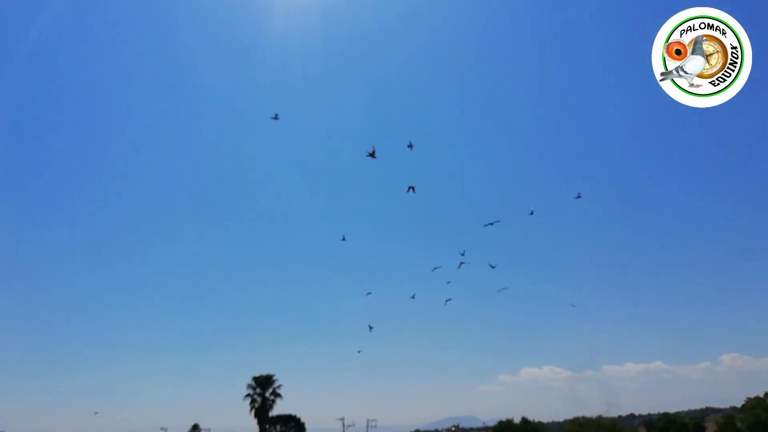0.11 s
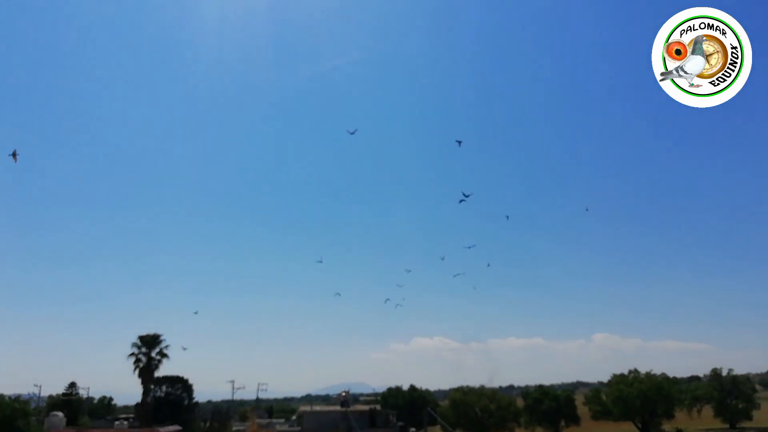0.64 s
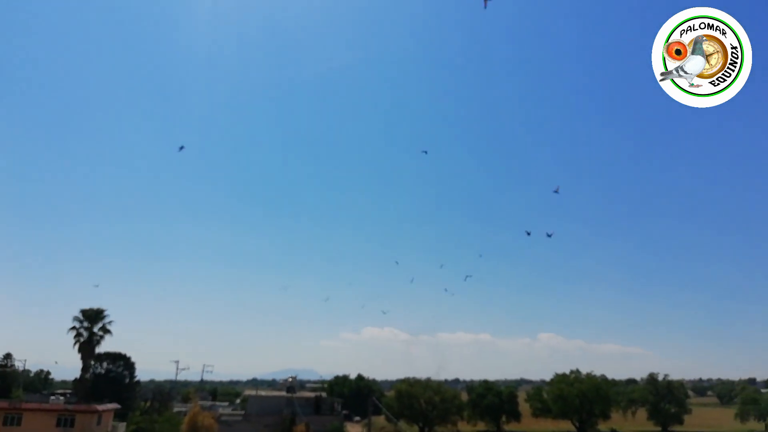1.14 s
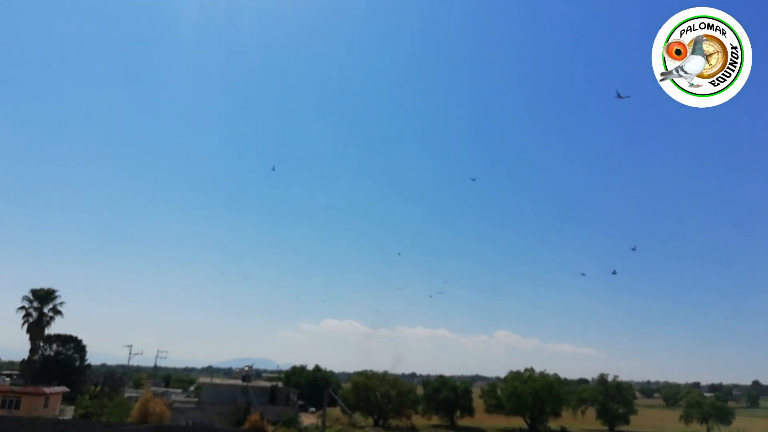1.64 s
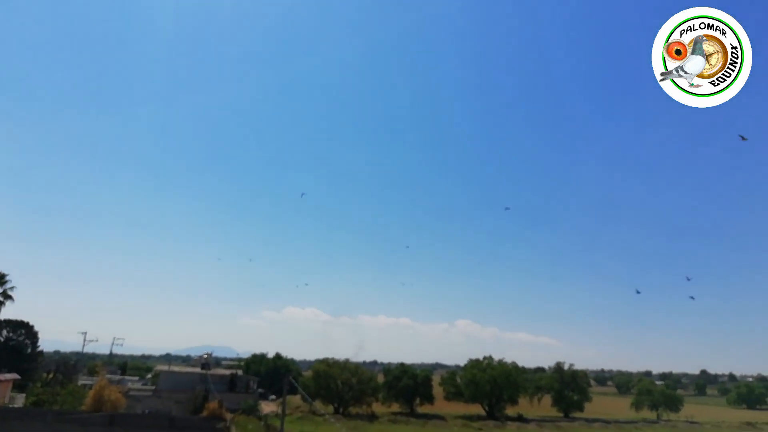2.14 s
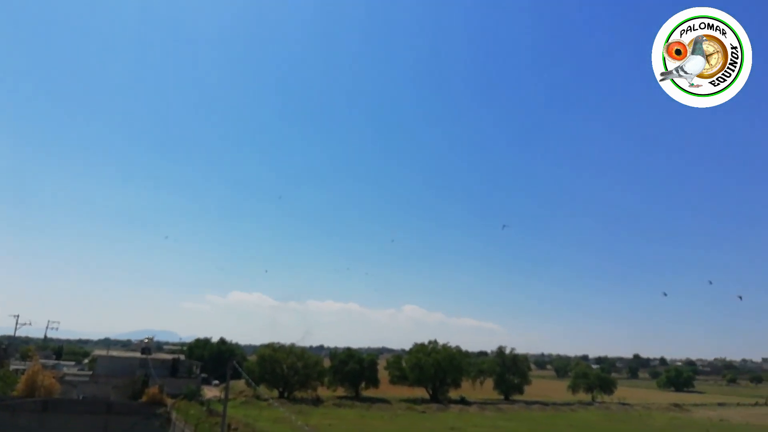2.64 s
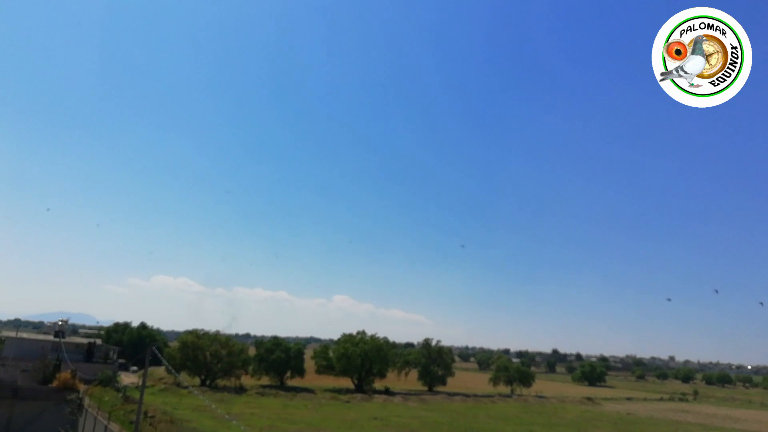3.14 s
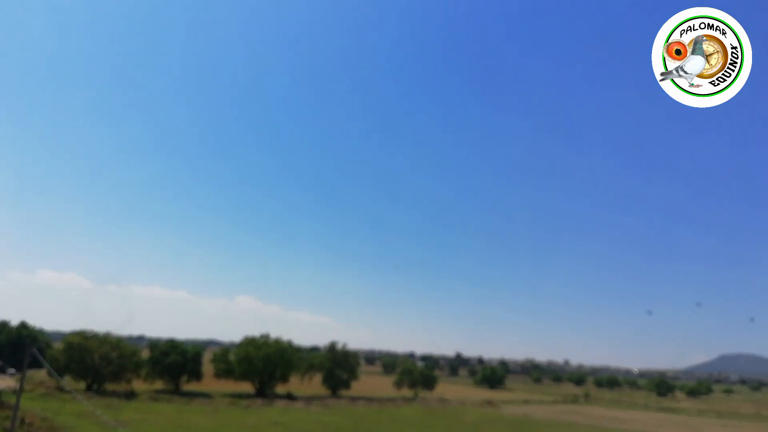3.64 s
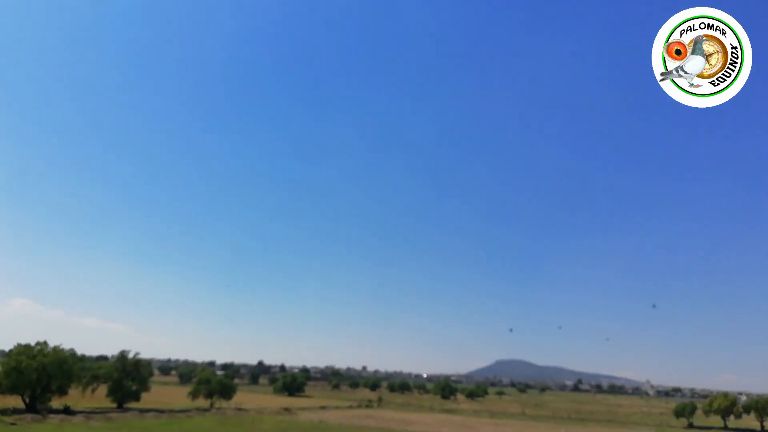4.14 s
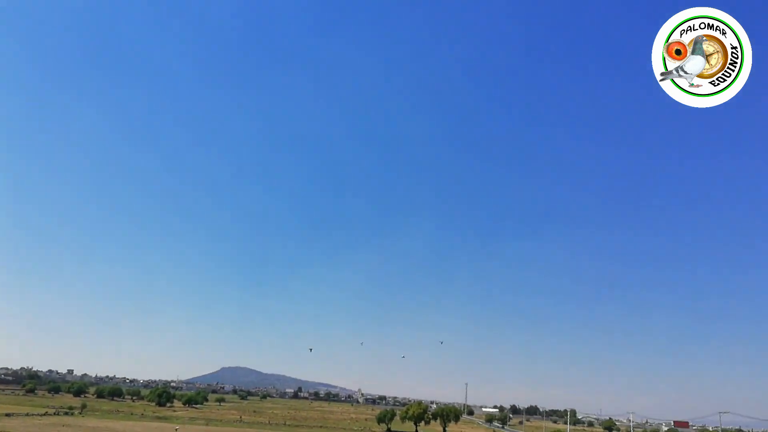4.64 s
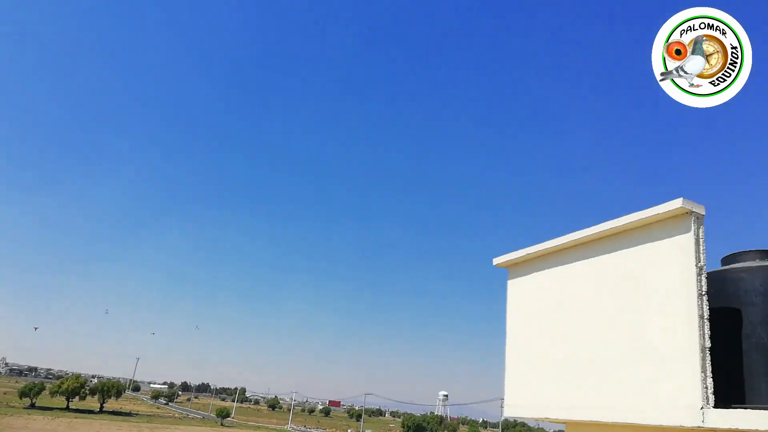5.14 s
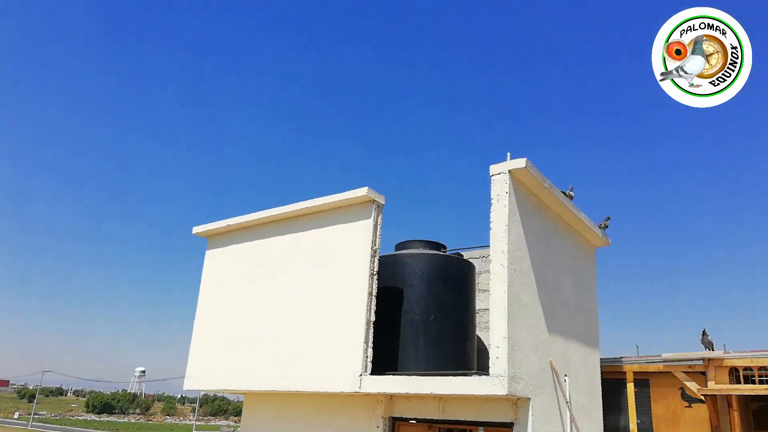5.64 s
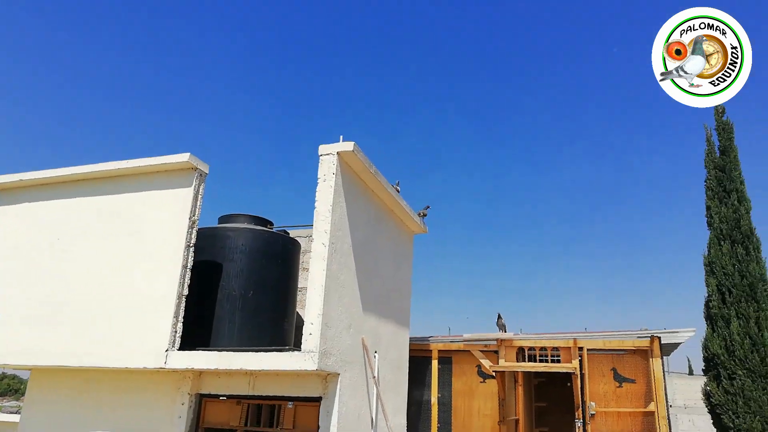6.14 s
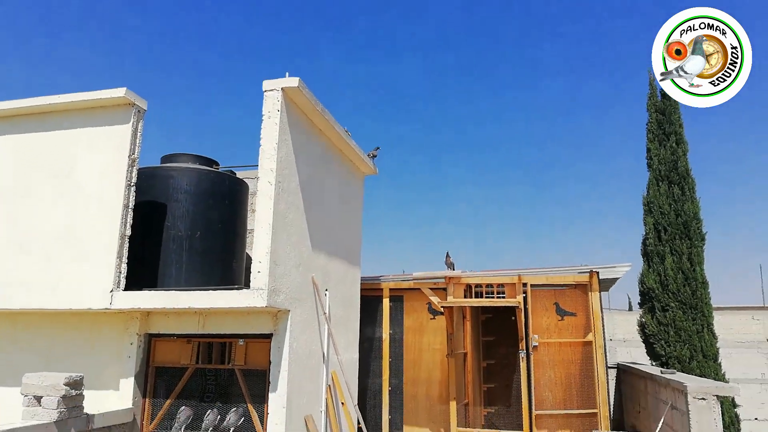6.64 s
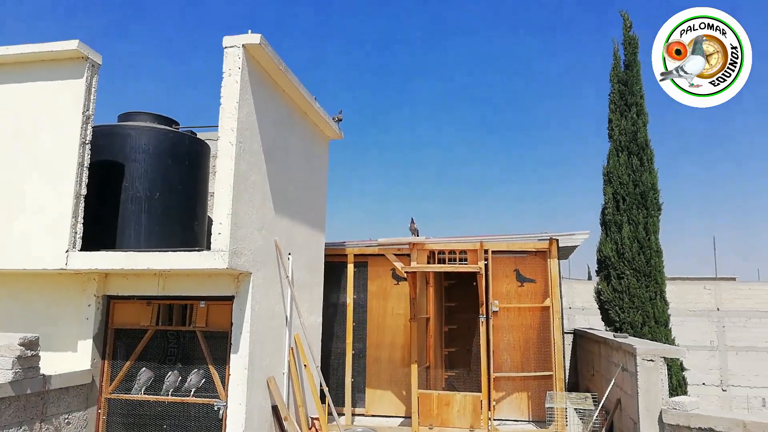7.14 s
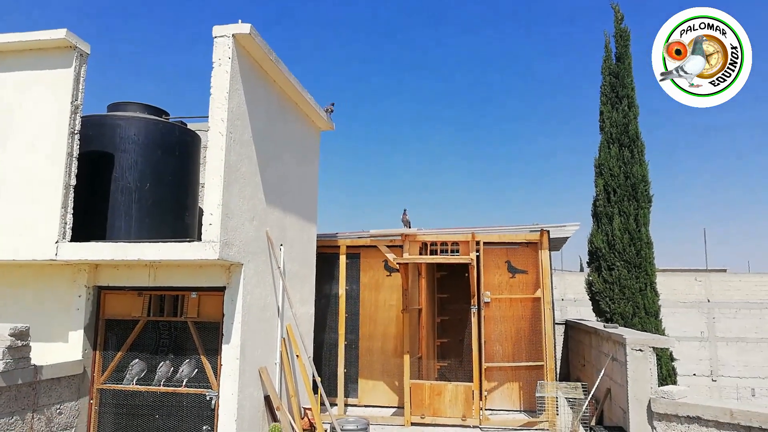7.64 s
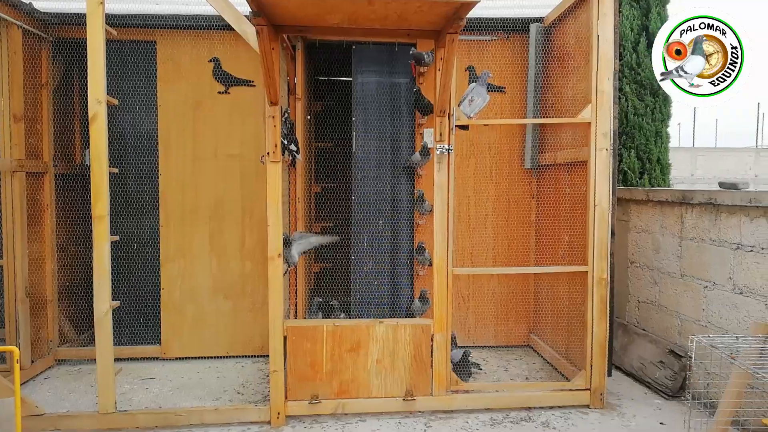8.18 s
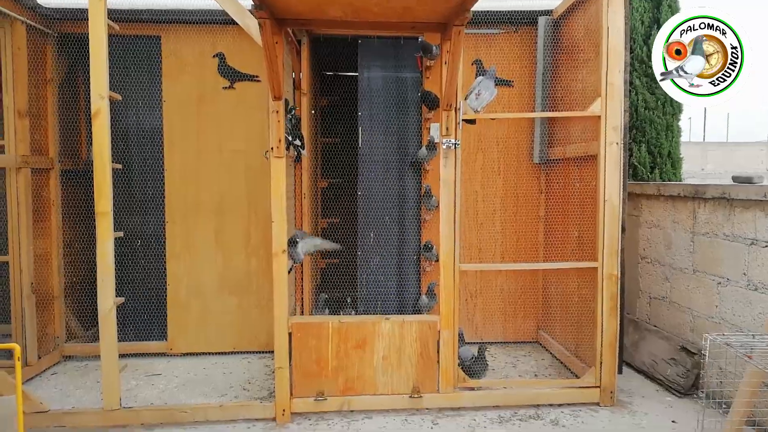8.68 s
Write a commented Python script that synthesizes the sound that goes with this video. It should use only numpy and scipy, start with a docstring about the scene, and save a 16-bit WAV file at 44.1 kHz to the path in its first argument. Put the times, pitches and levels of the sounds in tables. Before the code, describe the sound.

Close handheld outdoor pickup: wind thumps and cloth rustle come in lumps, with dry gritty scrapes and snaps. The middle is quieter, with soft distant coos, a faint buzzing horn and a repeated falling peep. Rough handling and wind surge, near sparrows call, then things calm. A quick rising squeal cuts to silence; rough young-bird squeals and airy wing flutter follow abruptly.

```python
"""Wind buffets a phone held on a rooftop by a pigeon loft; feet and feathers scuff close by, sparrows chirp
between walls, a dove coos and a horn buzzes far off, something squeaks upward. After a silent gap, young
birds squeal and wings rush by the loft door. Wind, scuffs and wings are shaped noise; hums, calls, horn
and squeak are sines on wavering pitch paths, the last three with a short answer of the walls."""
import sys
import numpy as np
from scipy import signal
from scipy.fft import rfft, irfft, next_fast_len
from scipy.io import wavfile
from scipy.ndimage import uniform_filter1d, map_coordinates

SR = 44100
rng = np.random.default_rng(int(sys.argv[2]) if len(sys.argv) > 2 else 0)


def dump(signal):
    """Clip the signal to [-1, 1] and save it as 16-bit WAV at the path in sys.argv[1]."""
    limited = np.clip(np.atleast_2d(signal).T, -1, 1)
    pcm = np.round(limited * 32767).astype(np.int16)
    wavfile.write(sys.argv[1], SR, pcm)


def volts(x):
    """Linear amplitude factor 10**(x/20) for a level x in dB, scalar or array-like."""
    e = np.asarray(x, float) / 20
    return 10 ** e


N = 387638
TIME = np.arange(N) / SR
GAP_S = (7.918, 8.2275)  # silent span: start, end

# movement of clothes and hands near the phone: (time [s], level [dB])
STIR = [(0, -68), (.27, -59), (.45, -64), (.6, -69.5), (.76, -69), (.95, -58.5), (1.55, -64.5),
        (1.78, -63.5), (2.08, -68.5), (2.33, -62.5), (2.55, -59), (2.62, -65.5), (2.74, -63), (2.8, -69.5),
        (4.95, -68.5), (5.17, -57.5), (5.3, -51.5), (5.6, -51.5), (5.85, -52.5), (6.05, -65.5),
        (6.6, -69.5), (7.6, -69.5), (7.72, -60), (7.9, -60), (8.23, -62), (8.41, -58.5), (8.79, -61.5)]


def unit(x):
    """Scales to rms 1."""
    return x / np.sqrt(np.mean(x ** 2) + 1e-20)


def along(points, hz):
    """Interpolates (Hz, value) points on a log frequency axis."""
    f, v = np.transpose(points)
    return np.interp(np.log(hz + 1), np.log(f + 1), v)


def curves(rows):
    """Interpolates each column after the time to one value per sample."""
    s, *cols = np.transpose(rows)
    return [np.interp(TIME, s, c) for c in cols]


def fade(start_s, end_s, edge_s):
    """Window over the span with linear edges."""
    return np.clip(np.minimum(TIME - start_s, end_s - TIME) / edge_s, 0, 1)


def wobble(rate_hz):
    """Smooth random curve, rate_hz knots a second."""
    knots = rng.standard_normal(int(N * rate_hz / SR) + 4)
    return map_coordinates(knots, [TIME * rate_hz])


def filtered(x, response):
    """Multiplies the spectrum of x by a complex response of frequency."""
    m = next_fast_len(N + SR // 2)
    return irfft(rfft(x, m) * response(np.fft.rfftfreq(m, 1 / SR)), m)[..., :N]


def ports(pair, spectrum):
    """Two unrelated signals as two ports hear them: coloured, partly alike, left late and shaded; mid rms 1."""
    # left-right likeness: (frequency [Hz], correlation [-1 to 1])
    alike = [(60, 1), (200, 0.93), (600, 0.76), (1200, 0.033), (10000, 0.056)]
    # bend of the left port beyond its delay: (frequency [Hz], phase lag [rad])
    bend = [(170, -0.15), (260, -0.29), (450, 0.88), (1100, 1), (2400, -0.43)]
    # the body shades the left port: (frequency [Hz], left over right [dB])
    lean = [(100, 0.5), (500, -3), (2000, -2), (7500, -7), (15000, -13.5)]
    delay_s = 0.000469

    def mid_side(hz):
        turn = np.arccos(np.clip(along(alike, hz), -1, 1)) / 2
        return volts(along(spectrum, hz)) * [np.cos(turn), np.sin(turn)]

    def left_right(hz):
        # half of the difference goes to each port
        lag_rad = along(bend, hz) + 2 * np.pi * hz * delay_s
        half = volts(along(lean, hz) / 2) * np.exp(-0.5j * lag_rad)
        return np.array([half, 1 / half])

    mid, side = filtered(pair, mid_side)
    both = filtered(np.array([mid + side, mid - side]), left_right)
    return both / np.sqrt(np.mean(both.mean(0) ** 2))


def rush(spectrum, patchy_db):
    """Coloured noise whose gain varies in random time-frequency patches."""
    z = signal.stft(rng.standard_normal((2, N)), nperseg=512)[2]
    field = uniform_filter1d(rng.standard_normal(z.shape[1:]), 6, 0)
    field = uniform_filter1d(field, 8, 1)
    patchy = signal.istft(z * volts(patchy_db * unit(field)), nperseg=512)[1][:, :N]
    return ports(patchy, spectrum)


def placed(x, pan_db, lag_samples, wet_db):
    """Source with a left-over-right level, its left copy lagging, plus the walls' decaying diffuse answer."""
    # (frequency [Hz], time to decay 60 dB [s])
    walls = [(200, 0.34), (3000, 0.38), (10000, 0.067)]
    hz, t, z = signal.stft(rng.standard_normal((2, SR // 2)), SR, nperseg=256)
    decay = volts(-60 * t / along(walls, hz)[:, None])
    tail = signal.istft(z * decay, SR, nperseg=256)[1]
    tail = tail / np.linalg.norm(tail[0])
    late = np.pad(x, (300, 0))  # the answer starts 300 samples late
    wet = signal.fftconvolve(late[None], tail, axes=1)[:, :N]
    direct = np.array([volts(pan_db / 2) * np.roll(x, lag_samples), volts(-pan_db / 2) * x])
    return direct + volts(wet_db) * wet


def bowed(table, bow):
    """Gliding notes gain a middle pitch, 0.5 + bow of the way through the glide."""
    return [(s, length_s, a_hz, a_hz + (0.5 + bow) * (b_hz - a_hz), b_hz, db)
            for s, length_s, a_hz, b_hz, db in table]


def notes(table, rough_rad, beaded_db, second_db):
    """Sines on arched pitch paths: rough_rad smears the line, beaded_db breaks it up, second_db is the octave."""
    out = np.zeros(N + SR)
    shake, flutter = wobble(380), wobble(110)
    for s, length_s, start_hz, middle_hz, end_hz, db in table:
        at, u = round(s * SR), np.linspace(0, 1, int(length_s * SR))
        hz = np.polyval(np.polyfit([0, 0.5, 1], [start_hz, middle_hz, end_hz], 2), u)
        here = np.minimum(at + np.arange(len(u)), N - 1)
        phase = 2 * np.pi * np.cumsum(hz) / SR + rough_rad * shake[here]
        tone = np.sin(phase) + volts(second_db) * np.sin(2 * phase)
        swell = np.sqrt(np.sin(np.pi * u).clip(0))
        out[at:][:len(u)] += volts(db + beaded_db * flutter[here]) * swell * tone
    return out[:N]


def wind_and_stir(flicker):
    """Wind lumps on the ports; stir raises thump, roar, rustle and hiss, wind adds to thump and roar."""
    # wind on the ports: (time [s], level [dB])
    wind = [(0, -47), (.28, -45), (.45, -61), (.76, -63), (.95, -46.5), (1.55, -43), (1.75, -58.5),
            (2.45, -50.5), (2.7, -56.5), (2.85, -61.5), (4.4, -62.5), (4.7, -52), (5.17, -49),
            (5.55, -39.5), (5.85, -42.5), (6.15, -59.5), (6.6, -60.5), (7.6, -61), (7.72, -58.5),
            (7.9, -79), (8.23, -39), (8.4, -43), (8.79, -59.5)]
    # noise colours, all: (frequency [Hz], relative level [dB per Hz])
    buffet_colour = [(10, -15.5), (22, 0), (40, -10.5), (60, -10.5), (90, -22.5), (150, -67.5)]
    thump_colour = [(40, -38), (65, -0.5), (105, -1.5), (135, -2.5), (175, -8), (300, -44)]
    roar_colour = [(100, -24.5), (170, -4), (260, -5.5), (400, -2), (650, -4), (1450, -12), (2000, -40.5)]
    rustle_colour = [(800, -15.5), (1200, -5.5), (2000, -3.5), (3000, -4.5), (4200, -4.5), (6000, -25.5)]
    hiss_colour = [(3500, -7.5), (5000, 4), (8000, 2.5), (10000, -1), (11500, -4), (14500, -16.5),
                   (16000, -39.5)]
    calm_db = -69.5  # stir and wind level at rest
    (wind_db,), (stir_db,) = curves(wind), curves(STIR)
    wind_rise_db, stir_rise_db = wind_db - calm_db, stir_db - calm_db

    buffet_db = wind_db + 0.46 * wobble(22)
    thump_db = -65.5 + 0.51 * stir_rise_db + 0.29 * wind_rise_db + 2.74 * wobble(14)
    roar_db = -72 + 0.79 * stir_rise_db + 0.33 * wind_rise_db + 1.2 * wobble(15)
    rustle_db = -66 + 0.66 * stir_rise_db + 1.1 * flicker + 1.8 * wobble(13)
    hiss_db = -70 + 0.9 * stir_rise_db + 2.6 * flicker

    buffet = volts(buffet_db) * rush(buffet_colour, patchy_db=-1.0)
    thump = volts(thump_db) * rush(thump_colour, patchy_db=-0.5)
    roar = volts(roar_db) * rush(roar_colour, patchy_db=2.5)
    rustle = volts(rustle_db) * rush(rustle_colour, patchy_db=3.0)
    hiss = volts(hiss_db) * rush(hiss_colour, patchy_db=3.0)
    return buffet + thump + roar + rustle + hiss


def faint_scuffs():
    """Small scuffs at random moments before the gap, their level following the stir."""
    rate_hz, over_stir_db, spread_db = 6, 18.5, 3
    when, size, knock, pitch = rng.random((round(rate_hz * GAP_S[0]), 4)).T
    s = when * GAP_S[0]
    db = np.interp(s, *np.transpose(STIR)) + over_stir_db + spread_db * np.log(size)
    return list(zip(s, db, -4 - 9 * knock, 1100 + 1700 * pitch))


def scuffs():
    """Each scuff is a dying spray of grit on the right, over a duller knock with its own hollow ring."""
    # (time [s], level [dB], knock over it [dB], knock ring [Hz])
    strokes = [(0.318, -49, -7, 800), (0.4577, -34.5, -4, 930), (0.798, -23, -14.5, 3100),
               (0.8071, -30.5, -10.5, 2420), (0.8594, -37.5, -21, 2500), (1.09, -35.5, -4, 802),
               (1.209, -32, -9.5, 1800), (1.2835, -47, 5.5, 2540), (1.3369, -37, -10, 2560),
               (1.755, -45, 1, 2800), (2.092, -45, -10, 2900), (2.204, -45, -7, 1500),
               (2.312, -39, -6.5, 2600), (3.202, -48.5, 5.5, 1950), (3.871, -38, -11, 2600),
               (3.893, -40.5, -9, 2320), (4.103, -44, 2, 1870), (4.571, -41.5, -3.5, 1940),
               (5.011, -34.5, -5, 1610), (5.125, -38, -10, 1260), (5.2315, -21, -9, 905),
               (5.2677, -20.5, -21, 2770), (5.3144, -21, -16, 1270), (5.4091, -32, -3.5, 990),
               (5.4944, -34.5, -14.5, 1410), (5.7643, -22.5, -6, 2620), (5.8193, -27.5, -4, 2390),
               (6.7364, -50, 4, 2600), (6.972, -49, -14, 3300), (7.1252, -32, -15, 990),
               (7.214, -38, -7, 1700), (7.712, -29.5, -6.5, 1230), (7.7538, -30.5, -17, 1320)]
    # noise colours: (frequency [Hz], relative level [dB per Hz])
    grit_colour = [(2500, -15.5), (4200, -1.5), (6000, -6.5), (8500, -3), (11500, -10.5), (13500, -13.5),
                   (16000, -42)]
    dull_colour = [(200, -14), (700, -12), (2200, -13), (3500, -12.5), (5000, -40)]
    bright, knocks, t = np.zeros(N + SR), np.zeros((2, N + SR)), np.arange(SR // 4) / SR
    spray = volts(-60 * t / 0.14) * (1 - np.exp(-t / 0.0011))
    spray = spray + 0.47 * volts(-60 * t / 0.0025)  # sharp onset
    thud = volts(-60 * t / 0.24) * (1 - np.exp(-t / 0.0014))
    dull = np.pad(rush(dull_colour, patchy_db=2.5), ((0, 0), (0, SR)))
    for s, db, knock_db, hz in strokes + faint_scuffs():
        at = round(s * SR)
        bright[at:][:len(t)] += volts(db - 14.0) * spray
        raw = dull[:, at:][:, :len(t)]
        ring = signal.lfilter(*signal.iirpeak(hz, 7, SR), raw)
        knocks[:, at:][:, :len(t)] += volts(db + knock_db - 9.0) * thud * (0.55 * raw + 2.3 * ring)
    grains = rng.standard_normal((2, N)) * volts(3.4 * wobble(700))  # grit comes in millisecond clumps
    grit = bright[:N] * ports(grains, grit_colour) * volts([[-8], [1.2]])
    ragged = volts(1.5 * wobble(70))  # feathers catch and let go
    return ragged * (grit + knocks[:, :N])


def bumps():
    """The phone body hums low and unsteadily when the grip shifts: quick start, then a sag."""
    # (time [s], length [s], pitch [Hz], level [dB])
    hums = [(0.461, .11, 120, -38), (0.662, 0.15, 121.4, -50.5), (5.194, 0.066, 110, -42.5),
            (5.458, 0.25, 95.4, -43.5), (5.702, 0.34, 95, -40.5)]
    sag_db = 6.5
    shake_rad, waver = 0.7 * wobble(40), volts(2.5 * wobble(45))
    out = np.zeros(N)
    for s, length_s, hz, db in hums:
        sagging = volts(db - sag_db * ((TIME - s) / length_s).clip(0, 1))
        out += sagging * fade(s, s + length_s, 0.0021) * np.sin(2 * np.pi * hz * TIME + shake_rad)
    return waver * out


def snaps():
    """Single dry cracks a few cycles long, close to the right port."""
    # (time [s], level [dB])
    cracks = [(0.8089, -18), (0.8112, -21), (5.2312, -22.5), (5.266, -26), (5.3152, -9), (5.014, -27.5),
              (7.1275, -29)]
    out, t = np.zeros(N), np.arange(80) / SR
    crack = volts(-60 * t / 0.0011) * np.sin(2 * np.pi * 7500 * t)
    for s, db in cracks:
        out[round(s * SR):][:len(t)] += volts(db) * crack
    return out * volts([[-9], [5]])


def twitter():
    """Short rough gliding chirps, answered by the walls."""
    # (time [s], length [s], start pitch [Hz], end pitch [Hz], level [dB])
    chirps = [(.915, 0.041, 4250, 3970, -54), (1.55, 0.023, 4340, 4120, -54), (2.862, .04, 4400, 5600, -64),
              (5.52, 0.033, 5100, 5900, -53), (5.536, 0.027, 4000, 4300, -49),
              (6.227, 0.032, 4570, 5400, -50), (6.395, 0.031, 3800, 3520, -58),
              (6.958, 0.049, 4700, 4070, -61.5), (7.13, 0.14, 3800, 3910, -62.5),
              (7.21, 0.044, 4230, 4800, -58.5), (7.535, 0.024, 3950, 4920, -58),
              (7.56, 0.022, 4080, 4560, -56), (7.583, 0.008, 4700, 5100, -53),
              (7.59, 0.015, 3250, 3810, -58)]
    dry_chirps = notes(bowed(chirps, bow=0.1), rough_rad=0.8, beaded_db=3.5, second_db=-44.5)
    return placed(dry_chirps, pan_db=-12.5, lag_samples=0, wet_db=-5.5)


def taps():
    """Light taps on something hollow: each sets the same husky noise resonances going."""
    # (time [s], level [dB])
    hits = [(0.986, -51.5), (1.022, -54), (5.819, -39), (6.244, -48.5), (6.335, -55.5)]
    # (resonance [Hz], relative level [dB])
    hollow = [(800, -4.5), (1550, -1.5), (2400, -5.5), (3300, -3)]

    def rings(f):
        return sum(volts(db) / (1 + ((f - hz) / 130) ** 2) for hz, db in hollow)

    swell = sum(volts(db - 60 * (TIME - s).clip(0) / 0.22) * fade(s, s + 0.3, 0.0025) for s, db in hits)
    return swell * unit(filtered(rng.standard_normal(N), rings)) * volts([[-2], [2.5]])


def coos():
    """A far dove: a soft throat tone, husky and broken, loudest where its pitch is highest."""
    # (time [s], length [s], start pitch [Hz], end pitch [Hz], level [dB])
    calls = [(1.72, 0.39, 251, 271, -62.5), (2.72, 0.19, 265.7, 257, -67.5),
             (3.36, .45, 206.6, 272.4, -62.5), (4.52, 0.33, 272.7, 235, -62)]
    out = np.zeros(N)
    for s, length_s, start_hz, middle_hz, end_hz, db in bowed(calls, bow=0.12):
        hz, = curves([(s, start_hz), (s + length_s / 2, middle_hz), (s + length_s, end_hz)])
        phase = 2 * np.pi * np.cumsum(hz) / SR + 0.9 * wobble(40)
        husk = volts(4.5 * wobble(25)) * np.sin(phase)
        pitch_db = -0.06 * (max(start_hz, end_hz) - hz)
        out += volts(db + pitch_db) * fade(s, s + length_s, 0.07) * husk
    return placed(out, pan_db=0.5, lag_samples=22, wet_db=-9)


def horn():
    """A far buzz: even pulses, so a ladder of partials, heard only near a few resonances."""
    # (resonance [Hz], width [Hz], level [dB])
    resonances = [(1120, 65, -69.5), (1790, 90, -74.5), (2120, 90, -78), (2680, 100, -76), (3250, 120, -78)]
    pulse_hz = 63.75
    phase = 2 * np.pi * pulse_hz * TIME + 0.045 * wobble(20)
    out = np.zeros(N)
    for order in range(14, 56):
        gain = sum(volts(db - 4.6 * ((order * pulse_hz - hz) / width_hz) ** 2)
                   for hz, width_hz, db in resonances)
        out += gain * np.sin(order * phase)
    out = out * volts(1.1 * wobble(12)) * fade(3.18, 4.2, 0.19)
    return placed(out, pan_db=-1.5, lag_samples=3, wet_db=-12)


def peeps():
    """One far bird repeats the same falling note."""
    # (time [s], level [dB])
    times = [(3.268, -64), (3.4, -67), (3.645, -68), (3.98, -70), (4.197, -64), (4.42, -67.5)]
    length_s, start_hz, end_hz = 0.056, 3420, 2950
    table = bowed([(s, length_s, start_hz, end_hz, db) for s, db in times], bow=0.25)
    dry_peeps = notes(table, rough_rad=0.3, beaded_db=1.5, second_db=-45)
    return placed(dry_peeps, pan_db=-12.5, lag_samples=0, wet_db=-5.5)


def sparrows():
    """Near calls: two voices gliding together on arched paths."""
    # (time [s], length [s], level [dB])
    calls = [(5.549, .062, -38.5), (6.253, 0.068, -38.5)]
    # (start pitch [Hz], middle pitch [Hz], end pitch [Hz], level over the call's [dB])
    voices = [(3220, 3820, 3250, 3), (3750, 4100, 3200, -3)]
    table = [(s, length_s, *path_hz, db + voice_db)
             for s, length_s, db in calls for *path_hz, voice_db in voices]
    dry_calls = notes(table, rough_rad=0.35, beaded_db=1.5, second_db=-40)
    return placed(dry_calls, pan_db=-5.5, lag_samples=-1, wet_db=-11)


def squeak():
    """A stick-slip squeal sliding upward, ragged while low, steady once tight."""
    # (time [s], pitch [Hz], level [dB])
    slide = [(7.764, 1400, -58), (7.787, 1340, -55), (7.803, 1714, -55), (7.815, 2780, -39.5),
             (7.826, 3230, -43), (7.836, 3390, -39), (7.871, 3585, -38.5), (7.918, 3595, -46.5)]
    # each partial from the first: relative level [dB]
    partials_db = [2, -10, -6, -8, 6, -4]
    # what the rubbed part radiates: (frequency [Hz], relative level [dB])
    body = [(1350, 2), (3000, -15), (3250, -3.5), (3500, 0), (4100, 12.5), (5500, 12.5), (7100, -6.5),
            (8300, 3), (10000, -17.5), (13000, -50)]
    hz, db = curves(slide)
    slack = np.clip(1 - hz / 3700, 0.07, 1)
    phase = 2 * np.pi * np.cumsum(hz) / SR + 0.75 * slack * wobble(500)
    tone = np.zeros(N)
    for order, partial_db in enumerate(partials_db, 1):
        ragged_db = 4.2 * slack * wobble(200)
        level_db = db + partial_db + along(body, order * hz) + ragged_db
        tone += volts(level_db) * np.sin(order * phase)
    tone = tone * volts(1.9 * wobble(150)) * fade(slide[0][0], slide[-1][0], 0.006)
    return placed(tone, pan_db=-13, lag_samples=0, wet_db=-12)


def wings(flicker):
    """Wings rush by the loft door as patchy noise, with one close stroke swelling and fading."""
    # (time [s], level [dB])
    by_door = [(8.23, -48.5), (8.54, -43.5), (8.66, -41), (8.79, -44.5)]
    # noise colours: (frequency [Hz], relative level [dB per Hz])
    wing_colour = [(700, -17), (1300, -6.5), (2200, 0.5), (2800, -1), (4200, -1.5), (5700, -6),
                   (6500, -14.5), (7800, -28.5)]
    stroke_colour = [(2600, -18), (3300, 1), (4300, 1.5), (5600, -23), (6900, 1), (8000, -4), (11500, -16),
                     (15000, -40)]
    wing_db, = curves(by_door)
    passing = (TIME > GAP_S[0]) * volts(wing_db + 0.43 * flicker) * rush(wing_colour, patchy_db=4.0)
    middle_s, half_width_s = 8.52, 0.12
    swell = volts(-44) * np.exp(-((TIME - middle_s) / half_width_s) ** 2)
    return passing + swell * rush(stroke_colour, patchy_db=1.0)


def young_birds():
    """Squeals: rough gliding notes with a strong octave."""
    # (time [s], length [s], start pitch [Hz], end pitch [Hz], level [dB])
    squeals = [(8.19, 0.105, 2450, 2230, -42.5), (8.33, 0.027, 4750, 4650, -44.5),
               (8.31, 0.081, 1310, 1303, -47.5), (8.34, 0.062, 2200, 2050, -41),
               (8.4, 0.055, 2090, 2190, -45.5), (8.48, .05, 2500, 2350, -48),
               (8.585, .075, 2070, 2060, -41), (8.655, 0.08, 2055, 2090, -39.5),
               (8.725, 0.04, 2156, 2184, -40.5), (8.62, .061, 1708, 1700, -41.5),
               (8.635, 0.04, 1856, 1850, -42), (8.65, 0.0635, 4400, 4200, -44.5),
               (8.6, 0.035, 3500, 4180, -45.5), (8.74, 0.055, 4300, 5500, -53.5),
               (8.76, 0.1, 1100, 1400, -52.5)]
    dry_squeals = notes(bowed(squeals, bow=-0.105), rough_rad=0.55, beaded_db=2.5, second_db=-11.5)
    return placed(dry_squeals, pan_db=-12.0, lag_samples=0, wet_db=-8)


def scene():
    """Sums all sources at the two ports."""
    flicker = wobble(30)  # shared by rustle, hiss and wings
    handling = bumps() + scuffs() + taps() + snaps()
    birds = twitter() + coos() + peeps() + sparrows() + young_birds()
    return wind_and_stir(flicker) + wings(flicker) + handling + birds + horn() + squeak()


def top_cut(x):
    """Nothing passes above the cut-off."""
    return signal.sosfilt(signal.butter(12, 15830, fs=SR, output="sos"), x)


def record(dry):
    """Mutes the gap with short edges."""
    mix = dry * (1 - fade(*GAP_S, 0.00039))
    return top_cut(mix)


dry = scene()
out = record(dry)
dump(out)
```